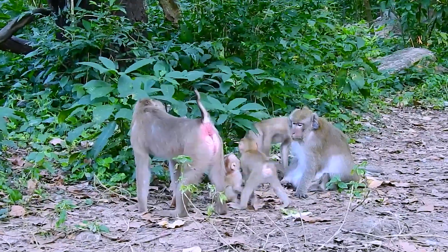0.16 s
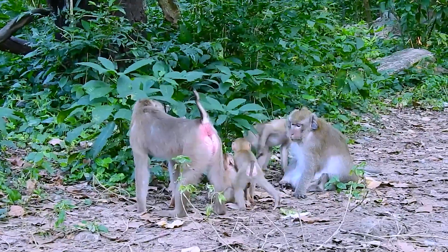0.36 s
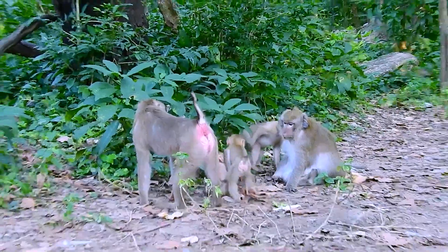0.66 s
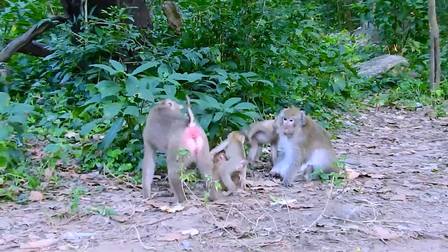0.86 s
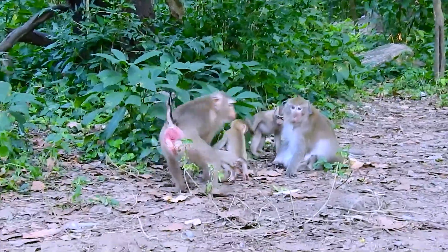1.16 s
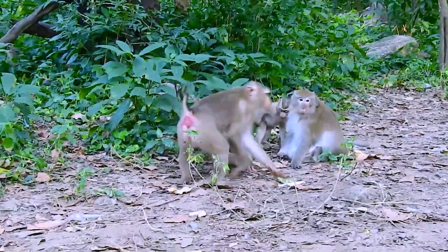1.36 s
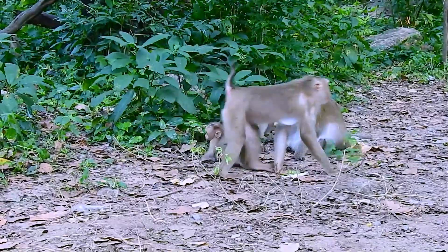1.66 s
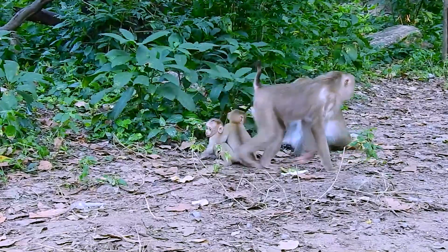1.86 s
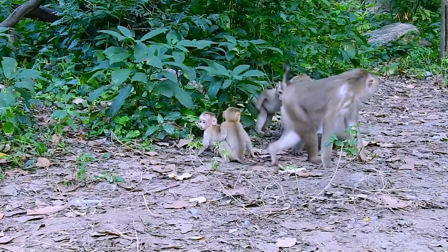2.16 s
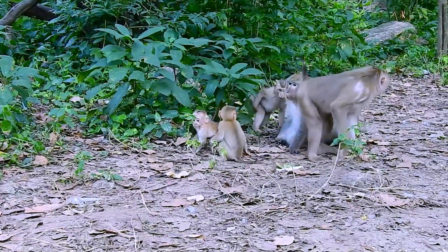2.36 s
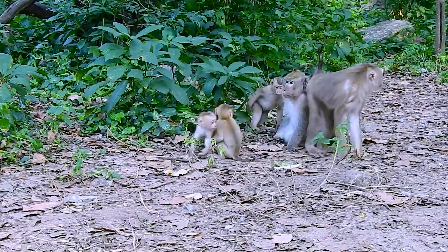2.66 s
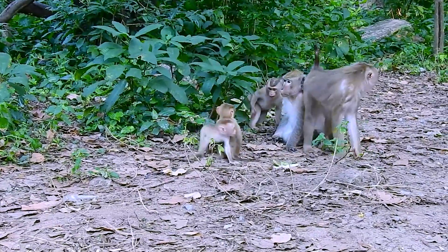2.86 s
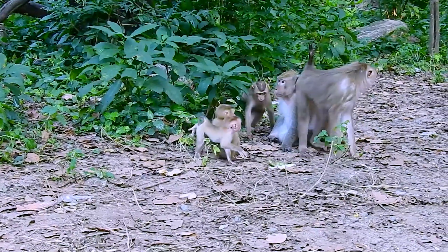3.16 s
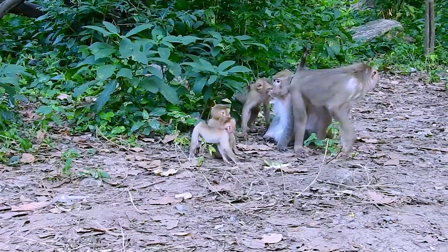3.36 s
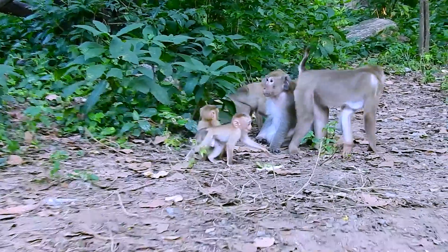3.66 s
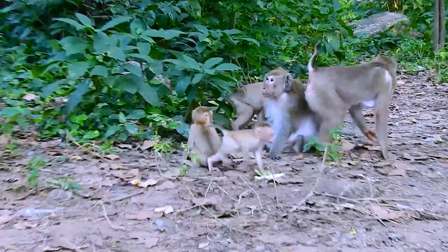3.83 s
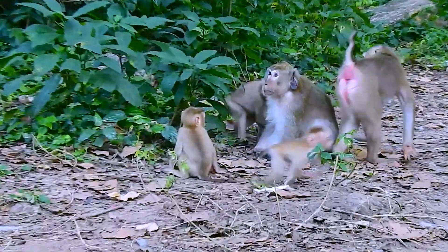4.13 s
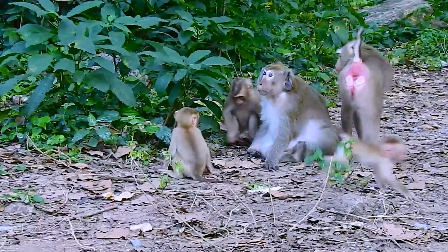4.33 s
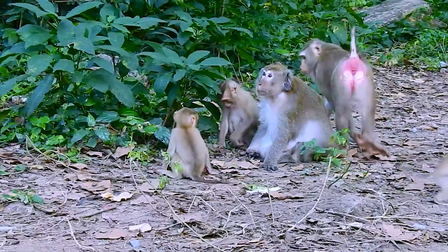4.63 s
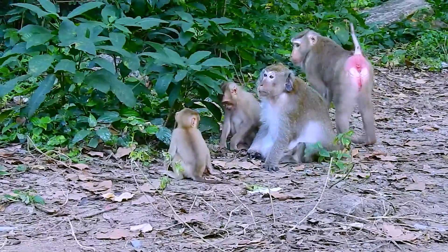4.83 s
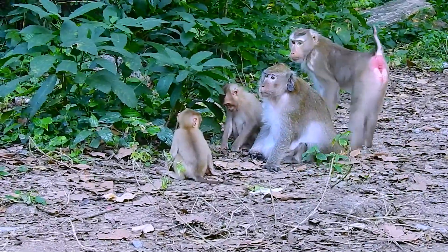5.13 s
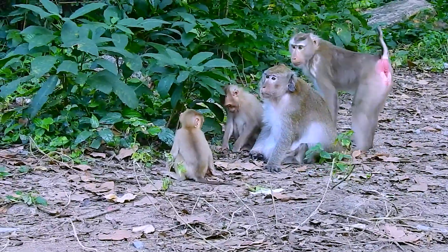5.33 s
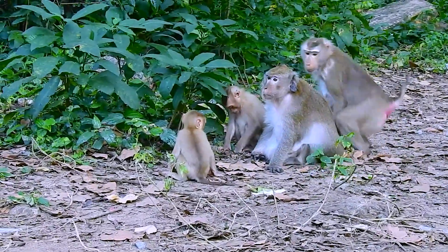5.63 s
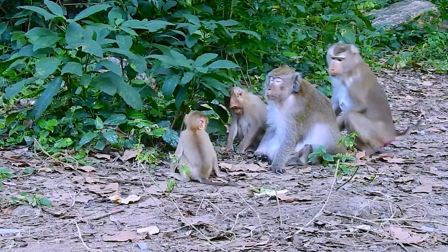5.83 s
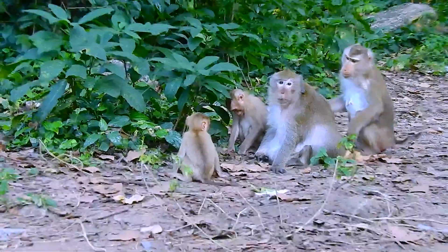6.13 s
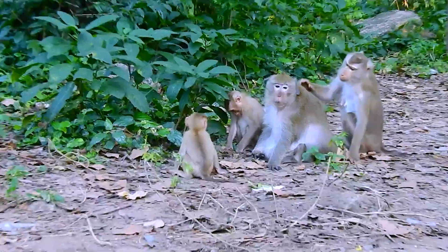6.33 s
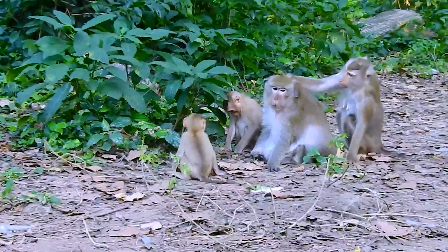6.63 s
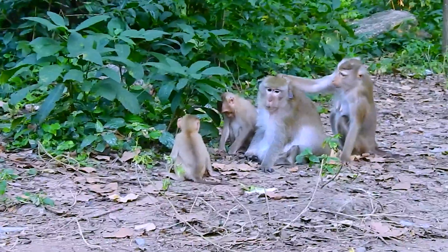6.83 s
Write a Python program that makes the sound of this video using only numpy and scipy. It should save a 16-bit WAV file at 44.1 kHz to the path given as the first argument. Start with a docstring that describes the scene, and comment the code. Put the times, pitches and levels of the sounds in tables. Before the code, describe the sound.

For the full 7 seconds a shrill cicada drone dominates, strongest near 5.7 kHz with weaker tones around 2.8 and 8.5 kHz. Its pitch stays nearly fixed, wavering slightly, and its loudness throbs about twice a second; it swells a little around 1.7 s. A hazy chorus of farther cicadas, a very faint insect trill, soft leaf hiss and a steady low rumble lie behind. Monkeys step on dry litter: a small crack at 0.07 s, ticks and rustles at 0.6 and 0.9-1.0 s. Tiny low coos glide around 0.3 and 1.2 s, then fainter ones near 3.0-3.4 and 4.2 s. Light ticks come at 3.75-3.9 s, a crisp snap at 4.56 s, rustling and a soft thud around 5.0-5.7 s. From 6.2 to 6.9 s, snaps, leaf crackle and dull footfalls gather. Stereo microphones in open woodland, with short diffuse echoes.

```python
"""A cicada sings one repeating phrase in a forest: a wavering pulse rate drives partials that resonances lift.
Farther cicadas blur into noise bands on its partials, beside a faint trill of another insect.
Shaped noise gives a low distant rumble and a hiss of leaves. Monkeys close by step on dry leaves and twigs:
cracks with decaying rings, grains of filtered noise and soft thuds. Now and then one coos, a gliding tone."""
import sys
import numpy as np
from scipy import signal
from scipy.fft import rfft, irfft
from scipy.io import wavfile
from scipy.ndimage import uniform_filter1d

SR = 44100
rng = np.random.default_rng(int(sys.argv[2]) if len(sys.argv) > 2 else 0)


def invert_db(level):
    """Linear amplitude ratio for a level in decibels (20 dB per decade), elementwise."""
    return 10 ** (np.asarray(level, dtype=float) / 20)


def store_wav(level_fs):
    """Save 16-bit WAV to argv[1]."""
    pcm = np.round(np.clip(np.atleast_2d(level_fs), -1, 1) * 32767)
    wavfile.write(sys.argv[1], SR, pcm.T.astype(np.int16))


N = 308469  # length in samples
LAG_S = 3.4e-5  # the cicadas reach the left channel first, by this many seconds

# Partials of the cicadas' pulse rate, before throb, flicker and swell. Each row: multiple of the pulse rate,
# near singer's level in dB, neighbours' level in dB, left-right difference in dB.
PARTIALS = [(4, -63, -63.5, -11), (5, -30.5, -34.5, -1), (6, -55, -59.5, 1), (7, -57.5, -59, -5.5),
            (8, -57, -59, -3), (9, -70, -79.5, -4), (10, -18.5, -26.5, -6), (11, -45.5, -45.5, -13.5),
            (12, -44.5, -45.5, -2.5), (13, -64, -52, 7), (14, -52, -48, 5), (15, -32.5, -39, 0),
            (16, -55, -63, 7), (17, -59, -73, -2), (18, -77, -75, 0), (19, -63, -81, -13),
            (20, -54.5, -57.5, -2.5)]


def evened(x):
    """Normalization: scales a signal to an rms of 1."""
    return x / np.sqrt(np.mean(x ** 2) + 1e-20)


def read(points, hz):
    """Interpolates a spectrum along a logarithmic frequency axis, as pitch is heard."""
    f, value = np.transpose(points)
    return np.interp(np.log(hz + 1), np.log(f + 1), value)


def add(mix, s, sound):
    """Superposition: sums a sound into both channels from s seconds on."""
    part = mix[:, round(s * SR):][:, :sound.shape[1]]
    part += sound[:, :part.shape[1]]


def slow(hz):
    """Low-passed white noise: a random wander of rms 1, up to about hz."""
    lowpass = signal.butter(2, hz, fs=SR)
    return evened(signal.lfilter(*lowpass, rng.standard_normal(N)))


def pan(db):
    """Level-difference stereo: gains of the two channels for a left-right difference in dB."""
    return invert_db(np.array([[db / 2], [-db / 2]]))


def noise(shape, lag_s=0):
    """Partly coherent two-channel noise from random short-time spectra; shape(hz) is the rms share of each bin."""
    # Likeness of the two channels. Each row: frequency in Hz, coherence from 0 to 1.
    likeness = [(60, 0.97), (150, 1), (300, 0.92), (570, 0.91), (1200, 0.91), (2500, 0.94), (5300, 0.94),
                (11000, 0.52)]
    frames, hz = N // 512 + 5, np.fft.rfftfreq(2048, 1 / SR)
    a, b, c, d, patches = rng.standard_normal((frames, len(hz), 5)).T
    # smoothed over 20 bins and 8 frames, so that loud and soft patches form
    patches = evened(uniform_filter1d(uniform_filter1d(patches, 20, 0), 8, 1))
    same = read(likeness, hz)[:, None]
    left = a + 1j * b
    delay = np.exp(-2j * np.pi * hz * lag_s)[:, None]
    right = same * left * delay + np.sqrt(1 - same ** 2) * (c + 1j * d)
    size = shape(hz)
    spectra = np.array([left, right]) * size[..., None] * invert_db(1.1 * patches)
    sound = signal.istft(spectra, nperseg=2048, noverlap=1536)[1][:, :N]
    return evened(sound) * np.sqrt((size ** 2).sum(-1).mean())


def forest(x, t60=0.25):
    """Multiple scattering by trunks and leaves: sparse random echoes die away, largely shared by the channels."""
    size = SR // 2
    sparse = rng.random((2, size)) < .05
    taps = rng.standard_normal((2, size)) * sparse * invert_db(-60 * np.arange(size) / SR / t60)
    taps[1] = 1.6 * taps[0] + .5 * taps[1]
    taps = taps / np.linalg.norm(taps, axis=1, keepdims=True)
    return signal.fftconvolve(x, taps, axes=1)[:, :N]


def near_cicada():
    """Periodic excitation and resonance: ribbed membranes click at a wavering rate; the body lifts every 5th partial."""
    phrase_s = .9366
    # Waver, the same in each phrase. Each row: time into the phrase in seconds, pulse rate in Hz.
    waver = [(0, 566.2), (.08, 570), (.26, 566), (.36, 568.6), (.43, 567.3), (.46, 563.5), (.55, 567.5),
             (.66, 570.2), (.77, 568), (.83, 570.7), (.9, 568)]
    # Low, middle and high body resonance, as multiples of the pulse rate.
    body = 5, 10, 15
    # The middle resonance throbs twice in a phrase. Each row: time into the throb in seconds, gain in dB.
    throb = [(.06, 0), (.16, -5.5), (.2, -3), (.245, -11), (.285, -12), (.315, -14), (.36, 0), (.45, -5)]
    t = np.arange(N) / SR
    low_db = -3.5 + 2 * slow(17)  # fades in and out at random
    middle_db = np.interp(t, *np.transpose(throb), period=phrase_s / 2)
    high_db = -2.54 + 3 * np.cos(4 * np.pi * (t - .26) / phrase_s)  # swells once in each throb
    zones_db = [low_db, middle_db, high_db]
    rate = uniform_filter1d(np.interp(t, *np.transpose(waver), period=phrase_s), size=300)
    rate = rate + 0.374 * slow(34.3)
    turns = np.cumsum(rate) / SR
    turns = np.array([turns, turns - LAG_S * rate])
    out = np.zeros((2, N))
    for k, db, _, side_db in PARTIALS:
        zone_db = zones_db[np.argmin(abs(np.array(body) - k))]  # nearest resonance
        # moving air makes each partial flicker by itself, a little differently in each channel
        flicker_db = 1.7 * slow(25) + 1.1 * np.array([slow(25), slow(25)])
        tone = np.sqrt(2) * np.cos(2 * np.pi * (k * turns + rng.random()))
        out += invert_db(db + zone_db + flicker_db) * pan(side_db) * tone
    return out + invert_db(-11.5) * forest(out)


def far_cicadas():
    """Incoherent summation: many singers at scattered rates blur into fuzzy bands on the partials."""
    neighbours_hz, neighbours_spread_hz = 570.3, 2.83  # pulse rate and its standard deviation
    # Far crowd. Each row: multiple of the pulse rate, level in dB before the swell, left-right difference in dB.
    crowd = [(5, -36, 5), (10, -33.5, 11.5), (15, -39.5, -4), (20, -69.5, 17)]
    # Scatter of the crowd's pulse rates. Each row: pulse rate in Hz, relative level in dB.
    spread = [(490, -20.5), (520, -6), (535, -4), (550, 3.5), (562, 8.5), (576, -3.5), (582, -19),
              (600, -9.5), (640, -16.5)]

    def bands(hz):
        """Adds the powers of all bands and gives the amplitude of each bin."""
        power = 0
        for k, _, db, side_db in PARTIALS:
            band = np.exp(-.5 * ((hz / k - neighbours_hz) / neighbours_spread_hz) ** 2)
            power = power + (invert_db(db) * pan(side_db)) ** 2 * band / band.sum()
        for k, db, side_db in crowd:
            band = invert_db(np.interp(hz / k, *np.transpose(spread), left=-99, right=-99)) ** 2
            power = power + (invert_db(db) * pan(side_db)) ** 2 * band / band.sum()
        return np.sqrt(power)

    return noise(bands, LAG_S)


def trill():
    """Amplitude and frequency modulation: thin lines of another insect waver in pitch and fade in and out."""
    # Lines of the trill. Each row: mean frequency in Hz, level in dB about which it fades.
    lines = [(3505, -72), (4070, -76), (4167, -71.5)]
    t = np.arange(N) / SR
    out = 0
    for hz, db in lines:
        wander = np.cumsum(5 * slow(9.8)) / SR  # 5 Hz rms
        out = out + invert_db(db + 4.1 * slow(11)) * np.sin(2 * np.pi * (hz * t + wander))
    return np.sqrt(2) * pan(1.5) * out


def air():
    """Spectrally shaped random noise: distant rumble below, faint hiss of leaves above."""
    # Background spectrum. Each row: frequency in Hz, relative level in dB per Hz.
    spectrum = [(24, -47), (39, -36), (52, -9), (72, 0.5), (110, 1.5), (180, -3), (260, -13.5), (420, -20),
                (900, -20.5), (1500, -25), (3200, -24.5), (4200, -31.5), (6300, -13.5), (7500, -27),
                (8800, -27), (9800, -70), (11800, -72), (12300, -99)]
    return invert_db(-32.5) * evened(noise(lambda hz: invert_db(read(spectrum, hz)) * pan(0.45)))


def snaps():
    """Impulsive fracture and free vibration: a short rough crack around a dull, damped double ring."""
    # Snaps of twigs and leaves. Each row: start in seconds, level in dB before the onset and decay,
    # ring in Hz, width of the crack in octaves.
    events = [(0.065, -12.5, 998, 0.68), (0.593, -23.5, 420, 1.3), (0.616, -20.5, 940, 0.73),
              (0.914, -21, 460, 0.83), (0.979, -23, 950, 1.1), (1, -23.5, 402, 1.2),
              (3.752, -25.5, 520, 1.2), (3.855, -27, 517, 1.3), (3.924, -20, 880, .4),
              (4.486, -21, 367, 0.94), (4.558, -6.5, 940, 2.9), (5.009, -23, 332, 1.5),
              (6.185, -22, 495, 0.94), (6.433, -24.5, 497, 1.2), (6.611, -16, 284, 1.7),
              (6.761, -22, 890, 1.6), (6.9, -25, 614, 1.6), (6.907, -14, 1240, 1.1)]
    crack_share, crack_top_hz = 0.51, 4300  # cracks carry little above this
    out, t, f = np.zeros((2, N)), np.arange(4096) / SR, np.fft.rfftfreq(4096, 1 / SR)
    for s, db, hz, octaves in events:
        t60 = 0.055 * np.sqrt(500 / hz)  # seconds; deeper snaps ring longer
        colour = np.exp(-.5 * (np.log2(f / hz + 1e-9) / octaves) ** 2)
        colour = colour / (1 + (f / crack_top_hz) ** 6)
        grit = rng.standard_normal((2, 4096))
        grit[1] = 0.95 * grit[0] + 0.46 * grit[1]
        burst = evened(irfft(rfft(grit) * colour)) * invert_db(-60 * t / (0.84 * t60))
        ring = np.sin(2 * np.pi * hz * t) + 0.44 * np.sin(2 * np.pi * 0.756 * hz * t)
        ring = ring * invert_db(-60 * t / t60)
        # the onset is soft, and a steeper fall cuts the exponential tail short
        envelope = (1 - np.exp(-t / 0.0019)) * np.exp(-(t / (0.35 * t60)) ** 3)
        snap = crack_share * burst + (1 - crack_share) * ring
        add(out, s, invert_db(db) * pan(0.53) * snap * envelope)
    return out + invert_db(-5.5) * forest(out, t60=0.11)


def coos():
    """Voiced tone with a weak second harmonic: it glides in pitch under one arch of loudness."""
    # Soft coos. Each row: start in seconds, length in seconds, level in dB at the top of the arch
    # before the huskiness, first frequency in Hz, last frequency in Hz.
    calls = [(0.283, 0.039, -34.5, 397, 506), (0.326, 0.032, -38, 470, 410),
             (1.191, 0.056, -42.5, 447, 475), (2.979, 0.17, -50.5, 364, 345),
             (3.16, 0.225, -48.5, 355, 415), (4.195, 0.2, -48, 413, 483)]
    out = np.zeros((2, N))
    for s, length, db, first_hz, last_hz in calls:
        u = np.arange(0, length, 1 / SR) / length
        turn = 2 * np.pi * np.cumsum(first_hz + (last_hz - first_hz) * u) / SR
        voice = np.sqrt(2) * (np.sin(turn) + 0.11 * np.sin(2 * turn))
        add(out, s, (invert_db(db) * np.sin(np.pi * u) ** 0.85 * voice)[None])
    husky = invert_db(2.3 * slow(60)) * out  # quick random changes of level
    return husky + invert_db(-3) * forest(husky, t60=0.27)


def rustles():
    """Granular friction noise: band-filtered crackle of uneven grains, quick to start and slower to settle."""
    # Feet shuffling in leaf litter. Each row: start in seconds, time constant of the decay in seconds,
    # level in dB before the envelope, centre in Hz, width in octaves.
    shuffles = [(0.581, .04, -48, 700, 1.2), (0.923, 0.12, -40.5, 497, 0.86),
                (0.976, 0.076, -36, 400, 0.44), (0.988, 0.048, -40, 2000, 0.56),
                (3.217, 0.051, -43, 900, 1.3), (4.482, 0.049, -33, 1520, 1.04),
                (4.57, .003, -29, 7500, 0.52), (5.03, .11, -55, 9800, 0.13), (5.312, 0.13, -35, 600, 1.4),
                (5.497, 0.52, -48, 1310, 0.38), (5.702, 0.054, -38, 596, 1.1),
                (6.198, 0.094, -35.5, 1090, 1.04), (6.376, 0.085, -42, 3570, 0.14),
                (6.439, 0.059, -39, 606, 1.46), (6.589, 0.069, -33.5, 3200, 0.25),
                (6.62, 0.13, -37, 500, 1.5), (6.638, 0.097, -37, 3500, 0.055), (6.77, .012, -45, 6000, 1.1)]
    # Faint narrow sounds of unclear source, like a low hum, a chirp and a hoarse call. Each row: as for shuffles.
    faint_tones = [(1.05, 0.86, -49, 373, 0.16), (2.645, .015, -36, 4770, .03),
                   (3.85, 0.37, -44, 926, 0.14)]
    # Soft footfalls on the soil. Each row: start in seconds, time constant in seconds, level in dB as above.
    thuds = [(3.967, .069, -46), (5.339, 0.13, -38.5), (6.188, .027, -30.5), (6.45, 0.038, -41),
             (6.611, 0.05, -28)]
    thud_hz, thud_octaves = 249, 0.3
    footfalls = [(*row, thud_hz, thud_octaves) for row in thuds]
    out, hz = np.zeros((2, N)), np.fft.rfftfreq(32768, 1 / SR)
    for s, length, db, centre_hz, octaves in shuffles + faint_tones + footfalls:
        u = np.arange(32768) / SR / length
        grain_level = np.repeat(np.minimum(rng.exponential(1, 256), 4), 128)  # new every 128 samples
        grains = rng.standard_normal((2, 32768)) * invert_db(2.74 * grain_level)
        grains[1] = 0.94 * grains[0] + 0.25 * grains[1]
        band = np.exp(-.5 * (np.log2(hz / centre_hz + 1e-9) / octaves) ** 2)
        envelope = np.minimum(u / 0.052, 1) * np.exp(-u ** 2)
        add(out, s, invert_db(db) * evened(irfft(rfft(grains) * band)) * envelope)
    return out


def scene():
    """Linear superposition: the cicadas swell together over the trill, the air and the ground sounds."""
    # Slow swell and drift of the singing. Each row: time in seconds, gain in dB, left-right difference in dB.
    drift = [(0, -0.4, 0), (.6, -0.1, 2), (1.2, -0.1, 0.5), (1.7, 1.5, 0.5), (2.2, 0.5, 2), (5, 0.12, 3.2),
             (5.7, 1, 2.8), (7, -0.5, 3)]
    s, db, side_db = np.transpose(drift)
    t = np.arange(N) / SR
    db, side_db = np.interp(t, s, db), np.interp(t, s, side_db)
    swell = invert_db(db + np.array([side_db / 2, -side_db / 2]))
    cicadas = swell * (near_cicada() + far_cicadas())
    return cicadas + trill() + air() + snaps() + coos() + rustles()


def low_pass(x):
    """Removes everything above the highest recorded frequency."""
    return signal.sosfilt(signal.butter(12, 15800, fs=SR, output="sos"), x)


def record(dry):
    """Takes the sum of all sources as the finished mix and hands it to the last stage, which rounds it and cuts
    off the top of the treble."""
    return low_pass(dry)


dry = scene()
out = record(dry)
store_wav(out)
```